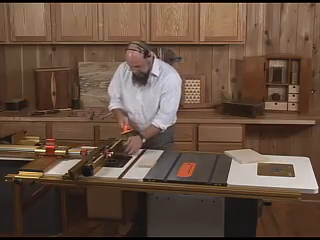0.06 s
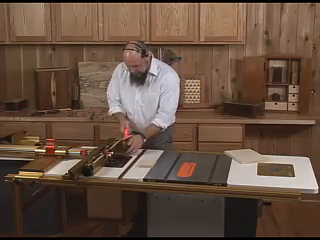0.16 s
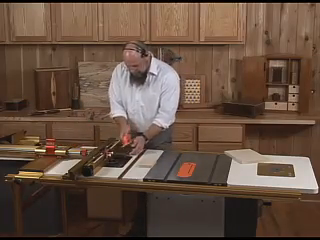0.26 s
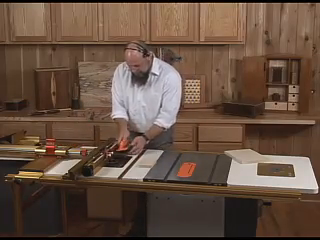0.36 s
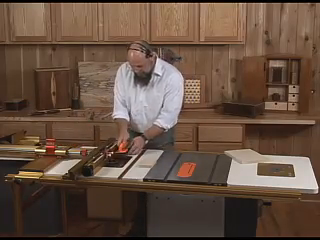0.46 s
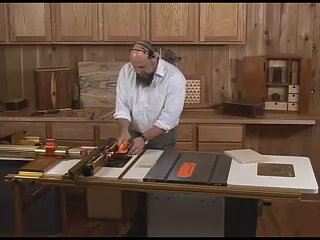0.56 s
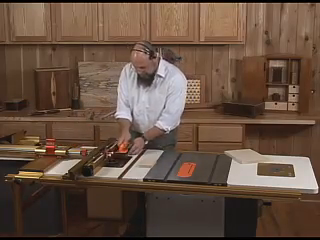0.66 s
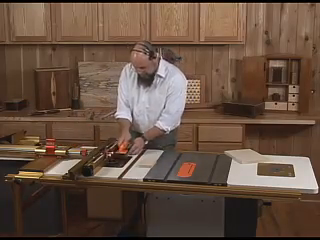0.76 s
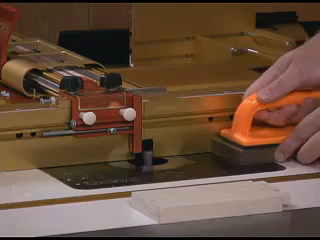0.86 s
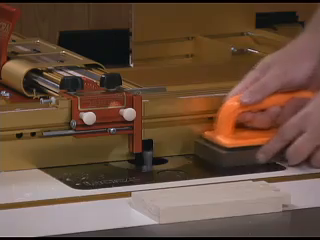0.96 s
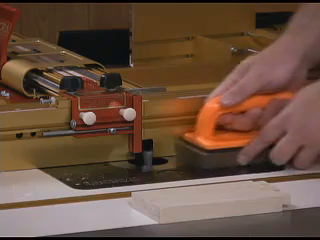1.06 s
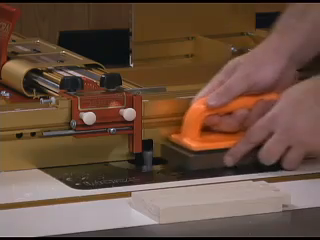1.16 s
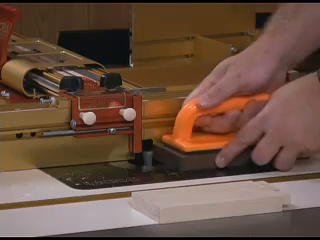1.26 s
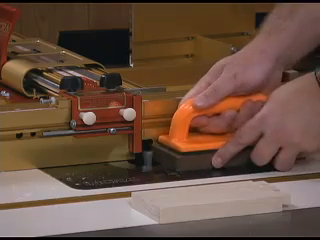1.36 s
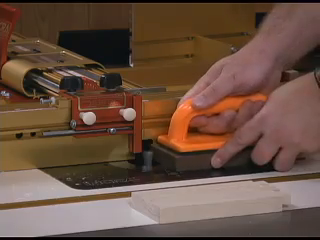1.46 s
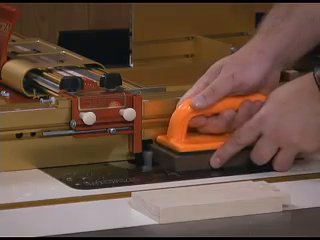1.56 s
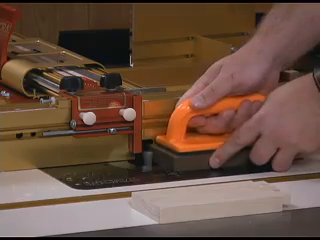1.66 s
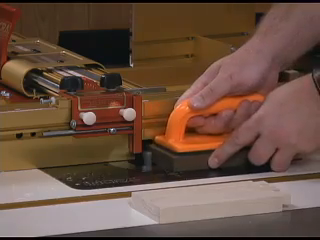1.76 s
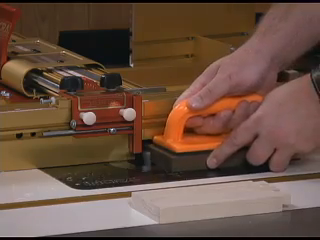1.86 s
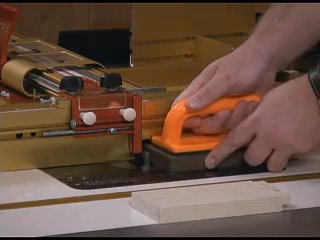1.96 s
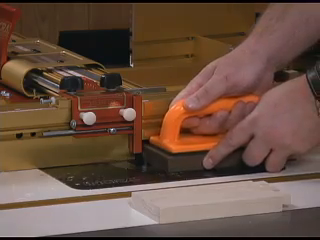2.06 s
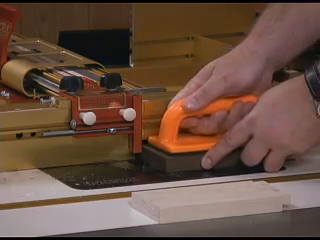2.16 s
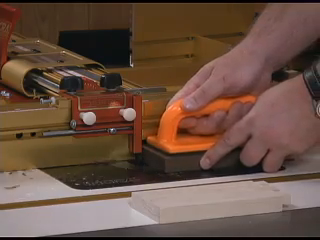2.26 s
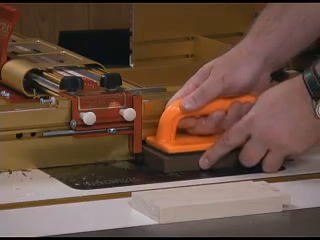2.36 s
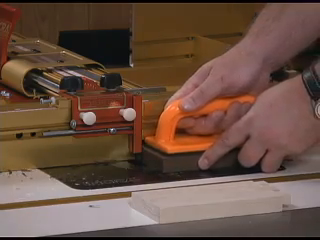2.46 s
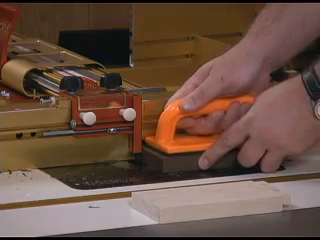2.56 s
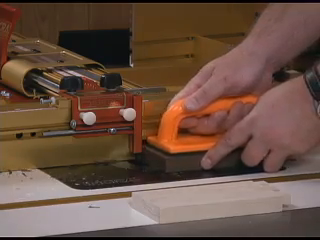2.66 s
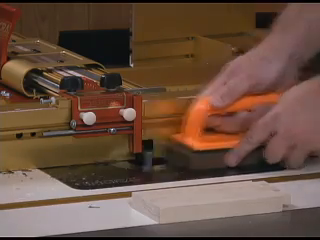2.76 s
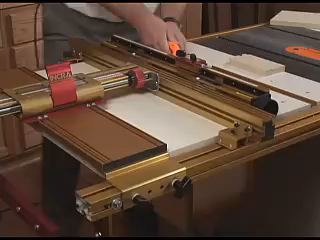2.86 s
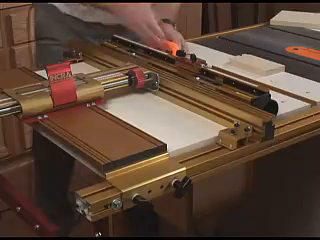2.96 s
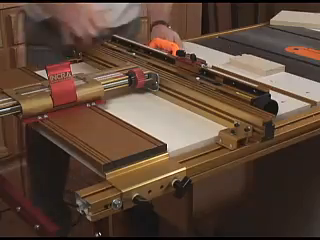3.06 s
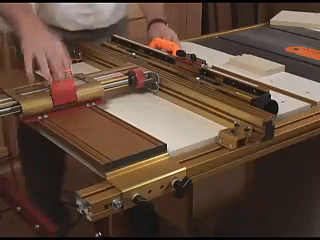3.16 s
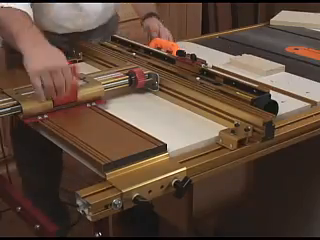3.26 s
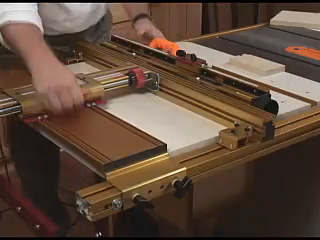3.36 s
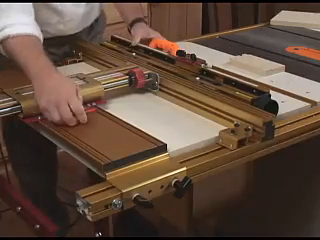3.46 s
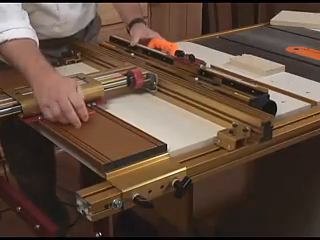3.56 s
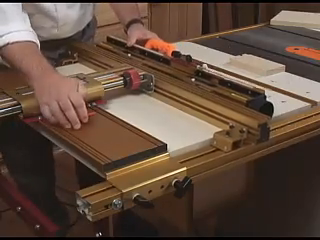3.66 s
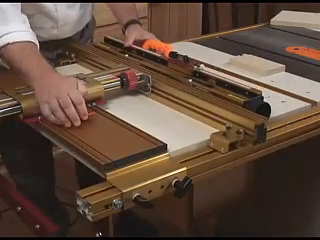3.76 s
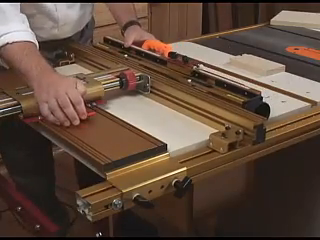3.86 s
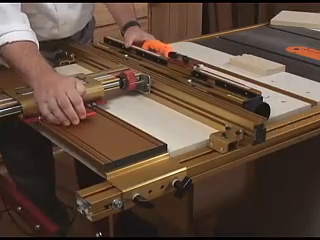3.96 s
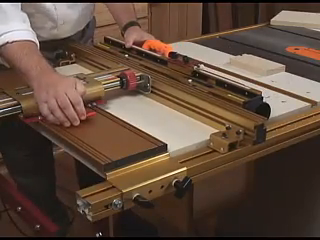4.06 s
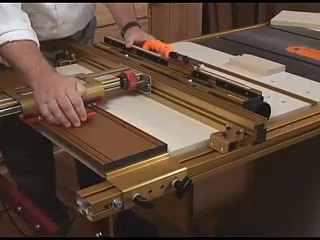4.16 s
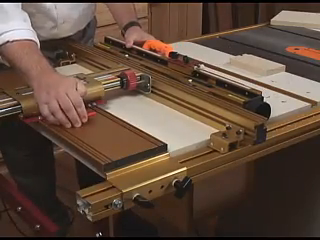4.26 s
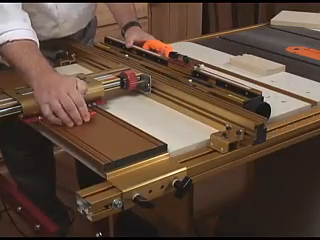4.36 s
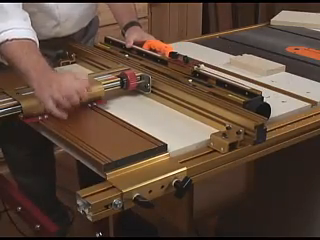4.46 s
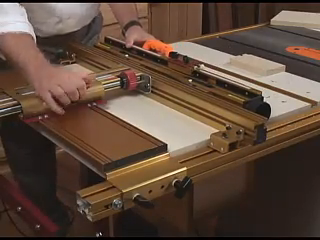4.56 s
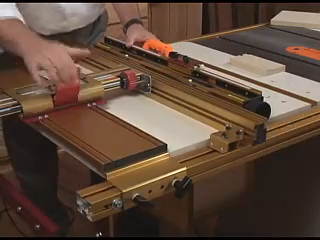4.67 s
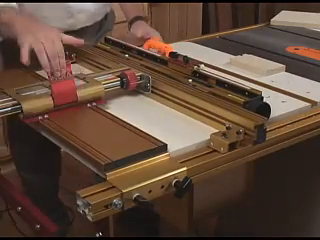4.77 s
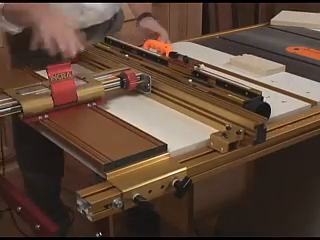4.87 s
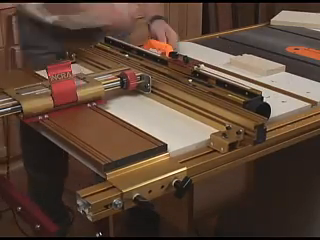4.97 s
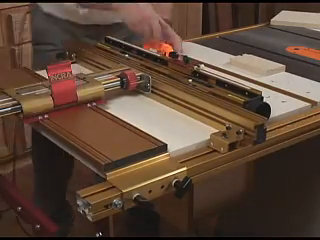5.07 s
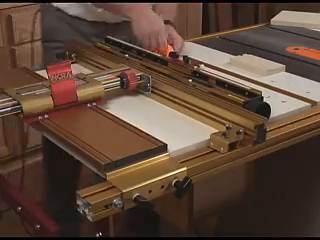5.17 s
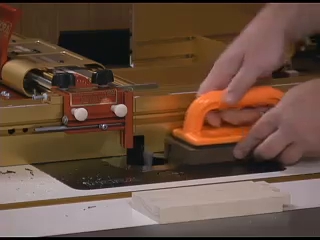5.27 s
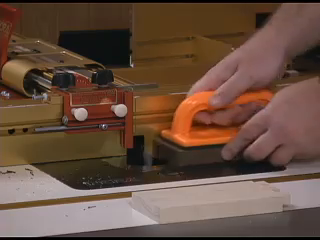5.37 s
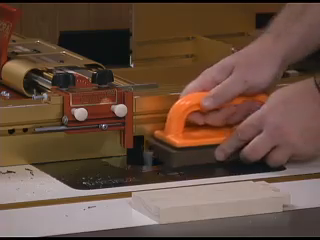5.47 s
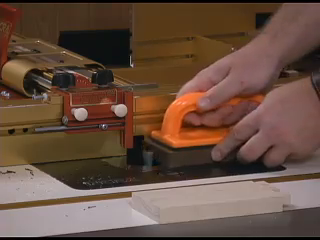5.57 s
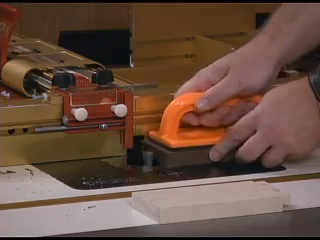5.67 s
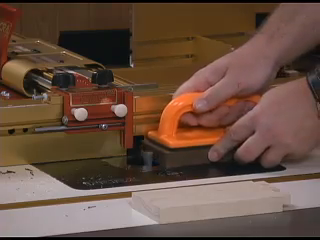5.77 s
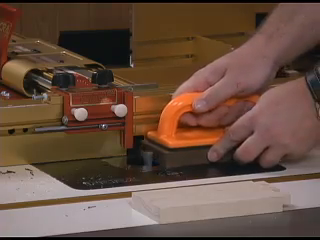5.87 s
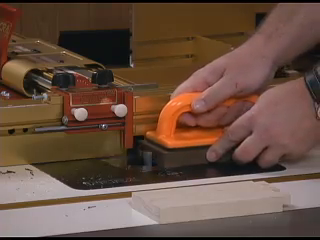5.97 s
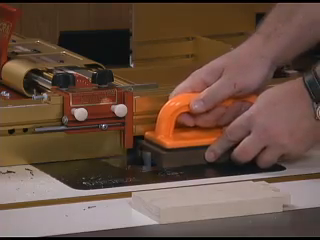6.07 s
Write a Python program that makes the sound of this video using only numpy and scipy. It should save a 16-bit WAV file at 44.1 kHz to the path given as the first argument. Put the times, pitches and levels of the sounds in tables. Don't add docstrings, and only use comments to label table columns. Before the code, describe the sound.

A sharp wooden clack opens as a table-mounted router is already spinning up, its whine rising over a rough airy roar. It bites a board: hammering buzz, sagging pitch, ripping fibres and hard knocks. A brief graze follows, then it runs free with brighter hiss and dull hand thuds until a second cut begins. Small wooden workshop, fairly close microphone, short reflections.

```python
import sys
import numpy as np
from scipy import signal
from scipy.fft import rfft, irfft
from scipy.io import wavfile
from scipy.ndimage import uniform_filter1d

SR = 44100
rng = np.random.default_rng(int(sys.argv[2]) if len(sys.argv) > 2 else 0)


def generate_wav(signal):
    frames = np.transpose(np.atleast_2d(signal))
    scaled = np.clip(frames, -1, 1) * 32767
    pcm = np.round(scaled).astype(np.int16)
    wavfile.write(sys.argv[1], SR, pcm)


def gain_from_decibels(decibels):
    exponent = np.asarray(decibels, float) / 20
    return 10 ** exponent


N = 269010
TIME_S = np.arange(N) / SR
MAINS_HZ = 120
TOP_SPEED_HZ = 380


def columns(table, quiet=None):
    s, *rest = np.transpose(table)
    return [np.interp(TIME_S, s, c, quiet, quiet) for c in rest]


def glide(points):
    s, value = np.transpose(points)
    slope = np.diff(value) / np.diff(s)
    before, after = slope[:-1], slope[1:]
    inner = np.where(after * before > 0, 2 * after * before / (after + before), 0)
    bend = np.r_[slope[0], inner, slope[-1]]
    k = np.clip(np.searchsorted(s, TIME_S) - 1, 0, len(slope) - 1)
    length = s[k + 1] - s[k]
    u = (TIME_S - s[k]) / length
    curve = (1 - u) * (bend[k] - slope[k]) - u * (bend[k + 1] - slope[k])
    return value[k] + length * u * (slope[k] + (1 - u) * curve)


def swells(rows):
    t = np.arange(0, N, 16) / SR
    total = sum(db * np.maximum(0, 1 - abs(t - s) / half) for s, db, half in rows)
    return total.repeat(16)[:N]


def walk(rate):
    knots = rng.standard_normal(int(N * rate / SR) + 2)
    return 1.2 * np.interp(np.arange(N) * rate / SR, np.arange(len(knots)), knots)


def db_sum(a_db, b_db):
    return 10 * np.log10(gain_from_decibels(a_db) ** 2 + gain_from_decibels(b_db) ** 2)


def shape_db(points, hz):
    point_hz, point_db = np.array(points).T
    return np.interp(np.log(np.maximum(hz, 1)), np.log(point_hz), point_db)


def filtered(x, points):
    return irfft(rfft(x) * gain_from_decibels(shape_db(points, np.arange(N // 2 + 1) * SR / N)), N)


def colour(x, points):
    y = filtered(x, points)
    return y / np.sqrt(np.mean(y ** 2))


def high_pass(x, hz, order):
    return signal.sosfilt(signal.butter(order, hz, "high", fs=SR, output="sos"), x)


def band(x, hz, width_hz):
    return signal.lfilter(*signal.iirpeak(hz, hz / width_hz, fs=SR), x)


def tone(turns, db):
    return np.sqrt(2) * gain_from_decibels(db) * np.sin(2 * np.pi * (turns + rng.random()))


def ring(hz, t60):
    t = np.arange(SR // 2) / SR
    return np.sin(2 * np.pi * hz * t) * np.exp(-np.log(1000) * t / t60)


def shop(x, wet_db):
    t60_s = 0.36
    t = np.arange(SR // 2) / SR
    tail = rng.standard_normal(len(t)) * np.exp(-np.log(1000) * t / t60_s) * (t > .004)
    tail = signal.lfilter([.5], [1, -.5], tail)
    tail /= np.sqrt(np.sum(tail ** 2))
    return x + gain_from_decibels(wet_db) * signal.fftconvolve(x, tail)[:N]


def bench_rumble():
    # pitch_hz, level_db (per Hz)
    spectrum = [(12, -44), (20, -11), (60, -8), (100, -14), (145, -11.5), (236, 3), (300, -12.5),
                (390, -34), (660, -120)]
    # middle_s, change_db, half_length_s
    leaning = [(.1, 7, .2), (1.55, 5, 0.09), (2.2, 8, 0.35), (2.68, 5, .08), (2.97, 12, 0.062),
               (4.25, -7, 0.28), (4.92, 11, .08), (5.63, 7, .14), (5.95, 5, .15), (.95, -5, .45),
               (3.75, -5, .3)]
    level_db = -76 + swells(leaning) + 2.5 * walk(9)
    return gain_from_decibels(level_db) * colour(rng.standard_normal(N), spectrum)


def hands():
    # start_s, peak_db
    clap_times = [(.1303, -18.5), (.1316, -21), (.139, -31), (.1428, -33), (.1455, -32), (.1605, -37),
                  (.178, -37), (4.715, -36), (4.86, -40)]
    # pitch_hz, level_db, t60_s
    block = [(830, 5.5, .022), (1060, 0, .014), (1750, -8, .01), (2250, -1, .02), (2550, 3, .016),
             (3200, 1, .012), (4050, 5, .013), (8750, 2, .006)]
    # pitch_hz, level_db (per Hz)
    crack_spectrum = [(400, -48), (750, 3.5), (4300, 3), (5500, -9.5), (11000, -19.5), (14000, -45)]
    # start_s, peak_db, pitch_hz, t60_s
    thud_times = [(0.139, -62, 43.3, 0.11), (0.679, -58, 164, 0.077), (1.549, -70, 222, 0.12),
                  (2.649, -60, 56.5, 0.12), (2.699, -63, 51.1, 0.1), (2.829, -59.5, 144, 0.13),
                  (2.93, -69, 208, 0.092), (2.99, -62, 219, 0.11), (3.199, -62, 26.74, 0.13),
                  (3.409, -44, 124, 0.072), (3.449, -61, 40.8, 0.1), (3.92, -69, 205.2, 0.11),
                  (4.6, -54, 135.6, 0.14), (4.639, -52, 143, 0.08), (4.923, -51, 152, 0.11),
                  (5.058, -56, 139, 0.086), (5.538, -63, 48.4, 0.14), (5.619, -69, 219, 0.12),
                  (5.717, -62.5, 58, 0.21)]
    claps, thuds = np.zeros(N + SR), np.zeros(N + SR)
    t = np.arange(SR // 2) / SR
    noise = colour(rng.standard_normal(N), crack_spectrum)
    block_ring = sum(gain_from_decibels(db) * ring(hz, t60) for hz, db, t60 in block)
    for s, db in clap_times:
        i = int(s * SR)
        crack = 1.3 * noise[i:i + len(t)] * np.exp(-t / .0028)
        onset = 1 - np.exp(-t / 0.00025)
        claps[i:i + len(t)] += gain_from_decibels(db - 11.5) * onset * (crack + block_ring)
    for s, db, hz, t60 in thud_times:
        i = int(s * SR)
        soft_onset = 1 - np.exp(-t / 0.0026)
        thuds[i:i + len(t)] += gain_from_decibels(db - 1.5) * soft_onset * ring(hz, t60)
    return shop(high_pass(claps[:N], 620, 3), wet_db=-10) + thuds[:N]


def fan(turns, shaft_hz, beat):
    # pitch_hz, level_db (per Hz)
    roar_spectrum = [(150, -51), (280, -15.5), (450, -9), (700, -8.5), (1000, -7.5), (1500, -5.5),
                     (2100, -7.5), (2700, -4), (3350, -5), (4200, -5.5), (4600, -10), (7000, -28.5),
                     (11000, -33), (14000, -82)]
    # pitch_hz, level_db (per Hz)
    rush_spectrum = [(3800, -54), (4800, -4.5), (6100, -4), (6900, -16), (8500, -13.5), (12000, -66)]
    # pitch_hz, level_db (per Hz)
    hiss_spectrum = [(5500, -25), (7200, -9), (9000, 8), (11600, 7), (12500, -6), (13600, -27),
                     (15200, -40)]
    # pitch_hz, width_hz, level_db
    housing = [(570, 40, -20), (640, 50, -20), (990, 70, -15), (1430, 110, -12), (1800, 110, -12),
               (3340, 170, -3), (3750, 200, -10)]
    # time_s, hiss_db
    vents = [(.12, -76), (.3, -71), (1.3, -71), (1.45, -78), (2.88, -82), (2.97, -62.5), (3.1, -60.5),
             (3.23, -61), (3.63, -61.5), (3.7, -59.5), (4.2, -57.5), (4.5, -59), (4.78, -58), (4.86, -62),
             (5.1, -67), (5.25, -86), (5.72, -81)]
    # middle_s, change_db, half_length_s
    body_moves = [(1.12, 1.5, 0.22), (1.8, -1, 0.72), (2.7, -3.5, 0.21), (2.95, 1, 0.15), (4.9, 1.5, 0.14),
                  (5.27, 0, 0.32)]
    # middle_s, change_db, half_length_s
    throat = [(.9, 6, 0.34), (2.4, -9, 0.43), (3.3, 1.5, 0.26)]
    hiss_db, = columns(vents)
    over_speed_hz = shaft_hz - TOP_SPEED_HZ
    roar_db = swells(body_moves) - 51.5 + 0.0314 * over_speed_hz
    rush_db = db_sum(-58.5 + 0.5 * over_speed_hz, hiss_db + 4)
    puffs = (1 + 0.099 * np.cos(2 * np.pi * turns)) * (1 + 0.018 * beat)
    air = rng.standard_normal(N) * puffs
    roar = colour(air, roar_spectrum)
    for hz, width_hz, db in housing:
        level_db = db + 13 + 1.2 * walk(9.4) + 1.4 * walk(1.88)
        if hz > 3000:
            level_db = level_db + swells(throat)
        roar += gain_from_decibels(level_db) * band(air, hz, width_hz)
    rush = colour(rng.standard_normal(N), rush_spectrum)
    hiss = colour(rng.standard_normal(N), hiss_spectrum)
    gusts = gain_from_decibels(0.92 * walk(7))
    hiss_level = gain_from_decibels(hiss_db + 0.11 * walk(7.3))
    return gusts * (gain_from_decibels(roar_db + 4.5) * roar + gain_from_decibels(rush_db) * rush + hiss_level * hiss)


def orders(blow_db):
    free_db = [-46, -50, -63.5, -61, -85, -94, -90]
    bite_db = [-28, 12.5, -2.5, -8.5, -8, -6.5, -0.5]
    # middle_s, change_db, half_length_s
    first_fades = [(0.074, -16, 0.073), (0.18, -9, 0.27), (0.456, -10, 0.028), (1.16, -9, 0.025),
                   (1.8, -13.5, 0.16), (2.038, 8, 0.23), (2.15, -10, 0.025), (2.33, -12, 0.094),
                   (2.425, -10, 0.11), (2.612, -17, 0.044), (2.705, -14, 0.046), (2.875, -12, 0.029),
                   (3.293, -4.5, 0.18), (3.8, -2.5, 0.37), (5.118, -9.5, 0.46), (5.926, -9.5, 0.094)]
    # middle_s, change_db, half_length_s
    second_fades = [(.1, -11.5, 0.45), (.43, -9, 0.057), (.68, -14, 0.31), (.92, 4.5, 0.16),
                    (1.08, -3, 0.17), (1.397, -11, 0.26), (1.77, -6, 0.059), (1.906, -10, 0.027),
                    (2.06, -11.5, 0.18), (2.275, -13, 0.045), (2.444, -14, 0.077), (2.609, -27, 0.027),
                    (2.735, -8, 0.061), (2.66, -11, 0.027), (2.88, -18, 0.014), (3.128, -2, 0.06),
                    (3.4, -14, 0.024), (3.911, -8, 0.17), (4.066, -8, 0.12), (4.3, -7, 0.36),
                    (4.565, -8.5, 0.18), (4.939, -17, 0.12), (5.52, -5, 0.45), (5.95, 1, 0.58)]
    # middle_s, change_db, half_length_s
    upper_fades = [
        [(.15, -16, 0.44), (.57, -1, .08), (1.3, 3, 0.36), (1.78, -8, 0.058), (2.1, -16, 0.23),
         (2.43, 11, 0.16), (3.33, 12, 0.15), (3.52, 11.5, 0.22), (3.93, 11, 0.28), (4.56, 15, 0.32),
         (4.78, 4.5, 0.18), (5.05, 10.5, 0.24), (5.52, 11, 0.25), (5.86, 10, 0.12), (6.08, -6, 0.06)],
        [(.1, -6, .35), (.57, -3, .07), (.918, 6.5, 0.093), (1.397, 3, .12), (1.7, 0, 0.15), (1.93, 6.5, 0.11),
         (2.15, -6, 0.074), (2.33, 12, 0.21), (3.05, 6, 0.072), (3.55, 0, 0.29), (3.93, 12, 0.053),
         (4.27, 5.5, 0.3), (4.76, 13.5, 0.086), (5.03, 3.5, 0.22), (5.71, 3, 0.13), (5.82, 12, 0.1)],
        [(1.6, 9.5, 0.13), (1.794, 11.5, 0.1), (1.95, -13, 0.12)],
        [(1.65, 0, .08), (1.9, -2, .1), (2.09, -3, 0.044), (2.76, 0, 0.07), (5.8, 13, 0.082), (5.97, 0, 0.072)],
        [(1.68, -1, 0.1), (1.85, -10, 0.12), (1.97, -4, .08), (2.1, -9, .1), (2.78, -8, .08), (5.82, 1, 0.064),
         (5.94, -13, 0.069), (6.06, -8, 0.075)],
    ]
    all_fades = [first_fades, second_fades, *upper_fades]
    return [db_sum(free, blow_db + bite) + swells(fades)
            for free, bite, fades in zip(free_db, bite_db, all_fades)]


def torque_beat_db(shaft_hz, blow_db):
    # middle_s, change_db, half_length_s
    throb_dips = [(1.83, -8, .1), (2.8, -10, .15), (3.6, -4, .6), (5.8, -8, .1), (5.95, -11, .25)]
    cutting_db = -5.5 - 1.2 * np.maximum(blow_db + 59.0, 0)
    cutting_db = np.where(blow_db > -100, cutting_db, -120)
    free_db = -17 + np.minimum(.35 * (TOP_SPEED_HZ - shaft_hz), 7)
    return np.maximum(cutting_db, free_db) + swells(throb_dips)


def motor(turns, orders_db, beat_db):
    side_tones = [(1, 1), (1, 2), (2, 1), (2, 2), (2, -1), (3, 1), (3, -1), (4, 1)]
    side_db = [-15, -17, -3, -15, -23, -2, -7, -13]
    # pitch_hz, level_db
    hum = [(60, -96), (120, -92.5), (240, -82), (840, -67), (960, -66)]
    # shaft_order, mains_multiple, level_db
    bars = [(42, -1, -79), (42, 0, -82), (44, -1, -83), (44, 0, -78), (44, 1, -82), (46, -1, -82)]
    mains = MAINS_HZ * TIME_S
    out = sum(tone((k + 1) * turns, db + 1.33 * walk(25)) for k, db in enumerate(orders_db))
    for (k, m), db in zip(side_tones, side_db):
        out += tone(k * turns + m * mains, orders_db[k - 1] + beat_db + db + 3.5 * walk(10))
    for hz, db in hum:
        out += tone(hz * TIME_S, db + 3.0 * walk(3))
    loaded = uniform_filter1d(1. * ((TIME_S >= 1.65) & (TIME_S <= 2.8)), 2000)
    for k, m, db in bars:
        out += loaded * tone(k * turns + m * mains + .15 * walk(60), db + 2.9 * walk(14))
    return out


def board_kicks():
    # start_s, peak_db
    kick_times = [(2.077, -31), (2.198, -23), (2.276, -26), (2.487, -27), (2.506, -32), (2.513, -35),
                  (2.53, -27), (2.537, -34), (2.55, -31), (2.556, -35), (2.574, -31), (2.61, -38)]
    # pitch_hz, level_db, t60_s
    board = [(790, 0, .03), (1150, -9, .02), (2350, -6, .012), (3250, -8, .01)]
    out = np.zeros(N + SR)
    knock = sum(gain_from_decibels(db) * ring(hz, t60) for hz, db, t60 in board)
    for s, db in kick_times:
        i = int(s * SR)
        out[i:i + len(knock)] += gain_from_decibels(db - 6) * knock
    return high_pass(out[:N], 500, 2)


def board_chatter(turns):
    # start_s, length_s, level_db
    bursts = [(1.96, 0.035, -45), (2.032, 0.1, -36), (2.187, 0.0059, -39.5), (2.267, 0.11, -47.5),
              (2.482, 0.073, -45.5)]
    # shaft_order, level_db
    chatter_tones = [(1.5, -17), (2.5, 1), (3.5, -14), (4.5, -26), (5.5, -12.5)]
    # time_s, level_db
    shudder = [(5.97, -70), (6.01, -51), (6.07, -50), (6.1, -53.5)]
    # shaft_order, level_db
    shudder_tones = [(3.38, -2), (5.59, 0), (6.56, -4), (7.22, -2), (7.54, -3)]
    burst_levels = []
    for s, length, db in bursts:
        rise = 497 * (s - TIME_S)
        fall = 280 * (TIME_S - s - length)
        burst_levels.append(db - np.maximum(np.maximum(rise, fall), 0))
    chatter_db = np.max(burst_levels, axis=0)
    out = sum(tone(k * turns + 0.075 * walk(30.03), chatter_db + db) for k, db in chatter_tones)
    shudder_db, = columns(shudder, quiet=-120)
    for k, db in shudder_tones:
        out += tone(k * turns + .05 * walk(40), shudder_db + db + 2 * walk(30))
    return out


def torn_wood(turns, tear_db):
    # pitch_hz, level_db (per Hz)
    tear_spectrum = [(200, -46), (300, -13.5), (550, -13), (809, -0.5), (1000, -11.5), (2300, -8.5),
                     (3300, -11.5), (5000, -21), (8000, -51)]
    # pitch_hz, level_db (per Hz)
    dust_spectrum = [(3500, -30), (5000, 1), (8000, 3.5), (11000, -6), (12500, -28), (15200, -13),
                     (16000, -70)]
    # middle_s, extra_tearing_db
    snags = [
        (2.06, 0),
        (2.11, -3),
        (2.17, -4),
        (2.201, 0.5),
        (2.24, 2),
        (2.275, 1.5),
        (2.48, -2),
        (2.52, -9),
        (2.55, -1),
    ]
    dust_db = -11.5 - (1 - 0.52) * (tear_db + 49.5)
    tear_db = tear_db + sum(db * np.exp(-((TIME_S - s) / 0.0089) ** 2) for s, db in snags)
    crackle_db = 1.6 * rng.exponential(size=N // 24 + 1).repeat(24)[:N]
    splinters = rng.standard_normal(N) * gain_from_decibels(crackle_db)
    splinters *= np.exp(-(2 * turns % 1) / .45)
    torn = colour(splinters, tear_spectrum) + gain_from_decibels(dust_db) * colour(splinters, dust_spectrum)
    return gain_from_decibels(tear_db - 3.0) * torn


def flute_blows(turns, shaft_hz, blow_db, low_db, beat):
    # pitch_hz, level_db (per shaft order)
    blow_spectrum = [(1500, -8.5), (2300, -2), (3500, -9), (5000, -16), (7500, -21), (10500, -27),
                     (12500, -31), (14000, -42)]
    # lowest_order, highest_order, middle_s, change_db, half_length_s
    bites = [(8, 14, 1.62, 4, .07), (8, 14, 1.85, -4, .2), (30, 33, 1.74, 7, .08), (22, 26, 1.79, 6, .05),
             (11, 17, 2.765, 10, .045), (8, 10, 2.79, -4, .05), (18, 27, 1.7, 3, .15),
             (18, 26, 2.75, 5, .08), (18, 26, 5.95, 4, .2), (8, 9, 2.1, -6, .25), (28, 32, 2.35, 8, .35),
             (34, 38, 1.75, -8, .25), (30, 36, 2.75, -5, .1), (8, 13, 5.79, 3, .04), (8, 10, 5.86, -5, .08),
             (12, 14, 2.77, 4, .04), (8, 11, 5.97, -5, .13), (18, 30, 5.9, -4, .2), (31, 35, 5.81, 8, .03),
             (31, 34, 6.0, 7, .05), (30, 38, 5.9, -5, .06)]
    orders_db = [shape_db(blow_spectrum, k * shaft_hz[::64]).repeat(64)[:N] for k in range(39)]
    for low_k, high_k, *swell in bites:
        change_db = swells([swell])
        for k in range(low_k, high_k + 1):
            orders_db[k] = orders_db[k] + change_db
    landed = turns + .0035 * walk(150)
    blows = np.zeros(N)
    for k in range(8, 39):
        odd_db = -3 * (k % 2)
        blows += tone(k * landed, orders_db[k] + odd_db + 3.2 * walk(45))
    throb = 1 + .55 * beat + .4 * (2 * beat ** 2 - 1)
    low = sum(tone((k + 5) * landed, db + 2.2 * walk(55)) for k, db in enumerate(low_db))
    return shop(gain_from_decibels(blow_db) * blows * throb, wet_db=-4.0) + low * (.6 + .4 * throb)


def scene():
    # time_s, shaft_hz
    speed = [(0, 278.4), (.25, 315.6), (.54, 340.9), (1.033, 357.9), (1.397, 361.4), (1.641, 359),
             (1.866, 347.2), (2.15, 322.6), (2.31, 317.8), (2.56, 324), (2.74, 339.2), (2.9, 350.8),
             (3.233, 364.3), (3.737, 373.9), (4.85, 380), (5.72, 378.8), (5.86, 375.8), (6.1, 363.7)]
    # time_s, tearing_db, flute_blows_db
    cuts = [
        [(1.5, -71, -59.5), (1.6, -65, -54.5), (1.635, -51, -52.5), (1.998, -42.5, -46.5), (2.072, -32, -47),
         (2.294, -40, -60.5), (2.34, -46.5, -60), (2.57, -43.5, -57), (2.62, -48, -74)],
        [(2.62, -59, -64), (2.65, -57, -54.5), (2.715, -46.5, -73), (2.735, -46, -61), (2.79, -56, -51),
         (2.83, -71, -60.5), (2.9, -64, -67)],
        [(5.72, -64, -79), (5.745, -59, -65), (5.768, -67, -50.5), (5.97, -52, -49), (6.036, -42, -51),
         (6.1, -49, -48)],
    ]
    shaft_hz = glide(speed)
    turns = np.cumsum(shaft_hz) / SR
    beat = np.cos(2 * np.pi * MAINS_HZ * TIME_S)
    tear_db, blow_db = np.max([columns(c, quiet=-120) for c in cuts], axis=0)
    orders_db = orders(blow_db)
    mono = bench_rumble() + hands() + fan(turns, shaft_hz, beat)
    mono += motor(turns, orders_db[:4], torque_beat_db(shaft_hz, blow_db))
    mono += board_kicks() + board_chatter(turns) + torn_wood(turns, tear_db)
    mono += flute_blows(turns, shaft_hz, blow_db, orders_db[4:], beat)
    return np.array([mono, mono])


def top_cut(x):
    return signal.sosfilt(signal.butter(12, 15550, fs=SR, output="sos"), x)


def record(dry):
    # pitch_hz, level_db (per Hz)
    preamp = [(20, -12), (300, -13.5), (700, -24.5), (5000, -40.5), (6500, -18.5), (11500, -18),
              (13000, -19), (14200, -40)]
    # pitch_hz, change_db
    left_top = [(11800, 0), (12500, -4), (13200, -14), (14200, -18)]
    own = []
    for channel_db in (-7, 3):
        level_db = -68.5 + channel_db + 1.0 * walk(2.5)
        own.append(gain_from_decibels(level_db) * colour(rng.standard_normal(N), preamp))
    own = signal.sosfilt(signal.butter(6, 13200, fs=SR, output="sos"), own)
    heard = dry + own
    heard[0] = filtered(heard[0], left_top)
    return top_cut(heard)


dry = scene()
out = record(dry)
generate_wav(out)
```